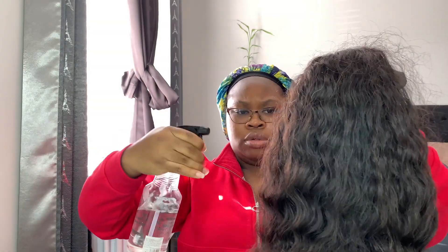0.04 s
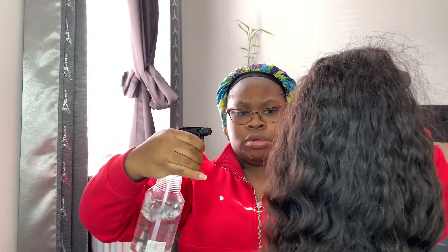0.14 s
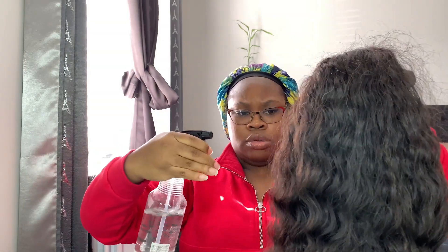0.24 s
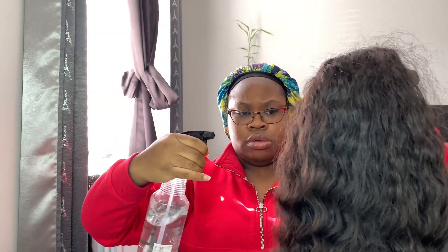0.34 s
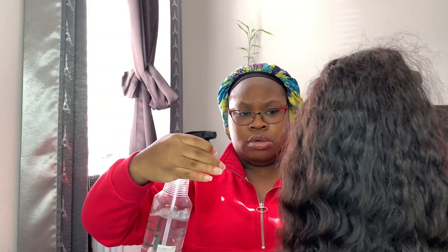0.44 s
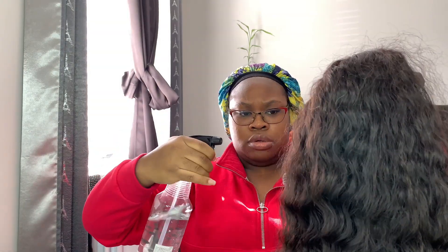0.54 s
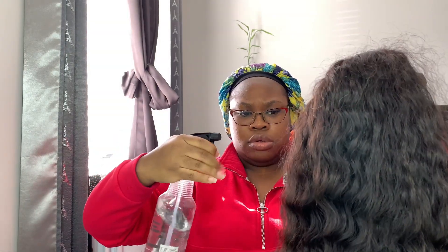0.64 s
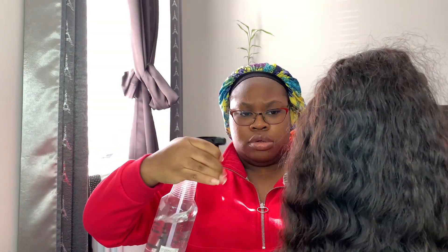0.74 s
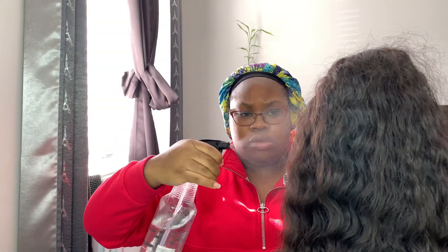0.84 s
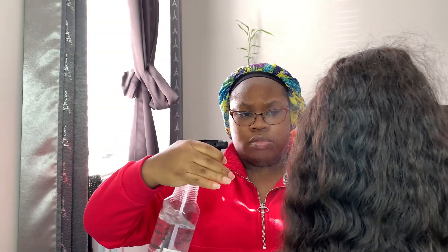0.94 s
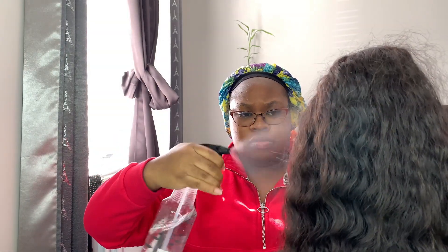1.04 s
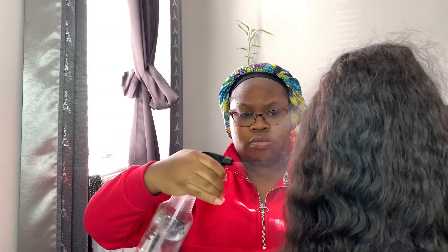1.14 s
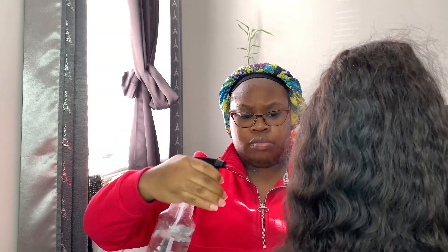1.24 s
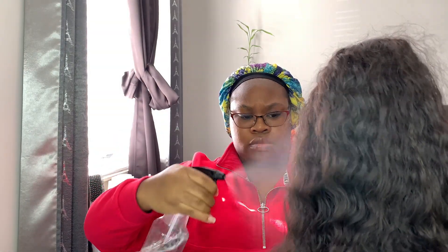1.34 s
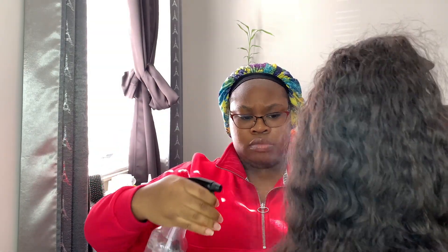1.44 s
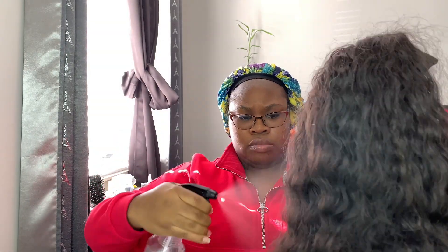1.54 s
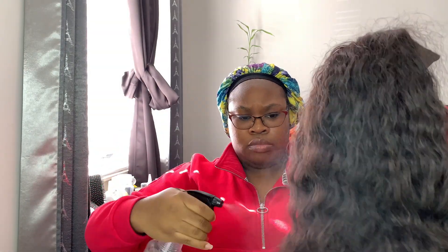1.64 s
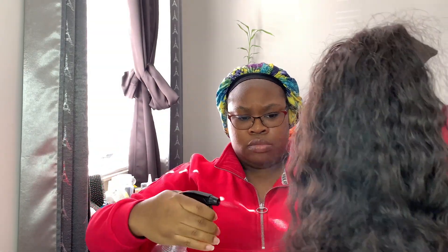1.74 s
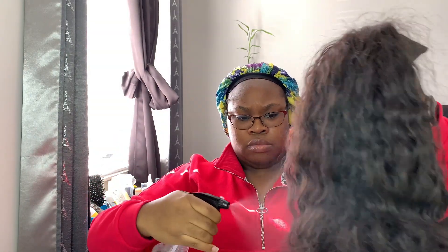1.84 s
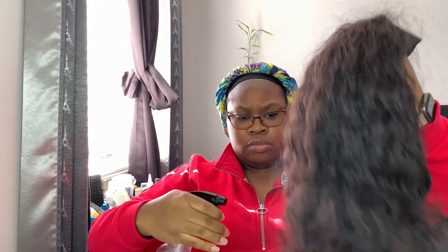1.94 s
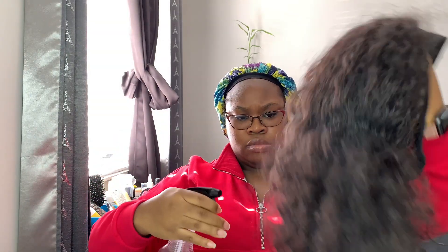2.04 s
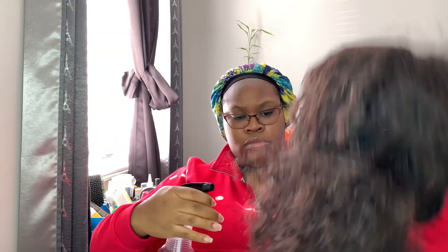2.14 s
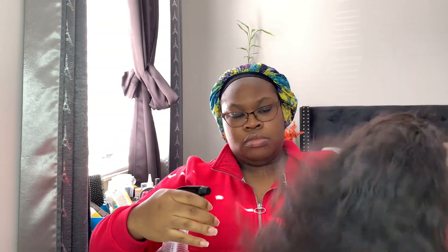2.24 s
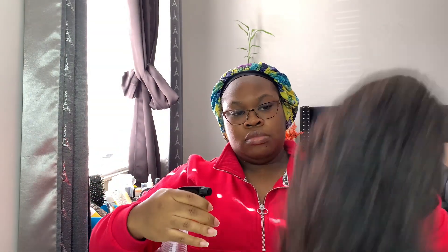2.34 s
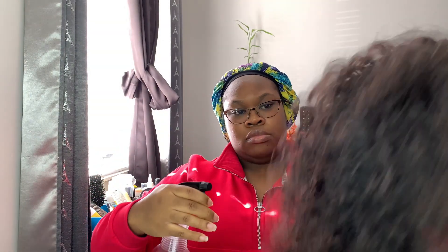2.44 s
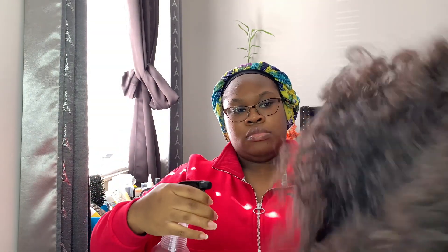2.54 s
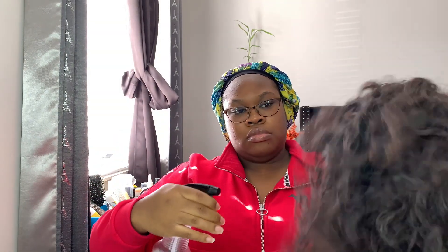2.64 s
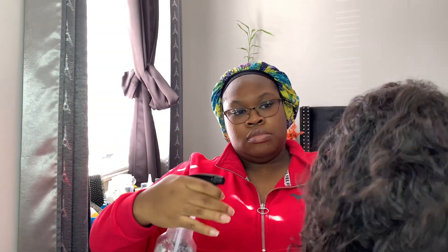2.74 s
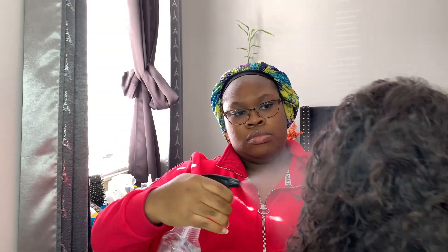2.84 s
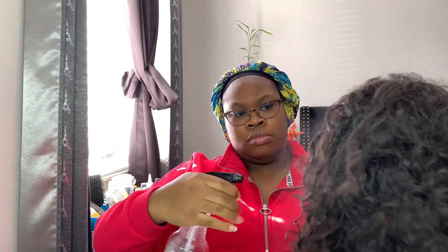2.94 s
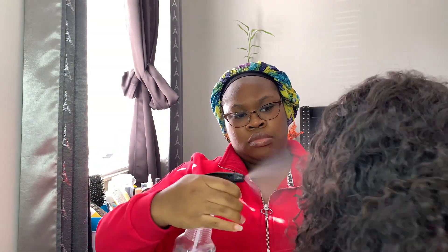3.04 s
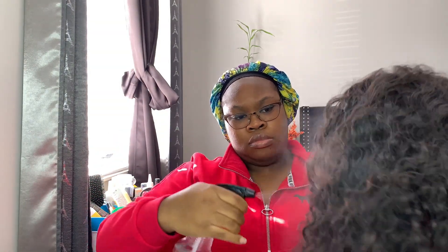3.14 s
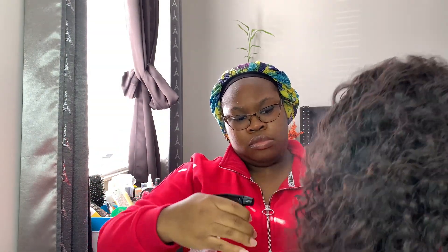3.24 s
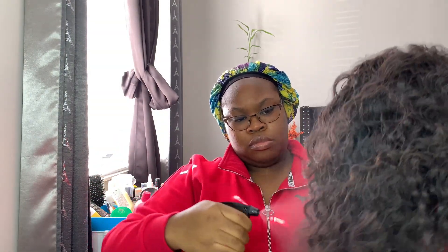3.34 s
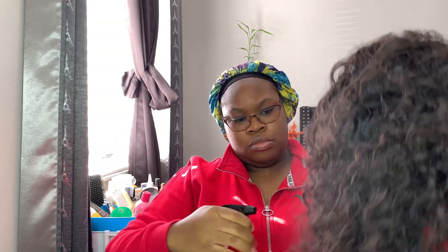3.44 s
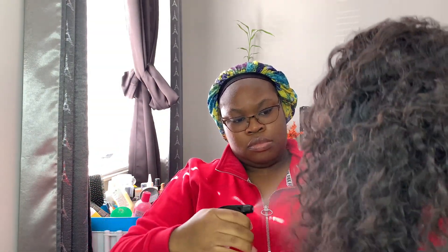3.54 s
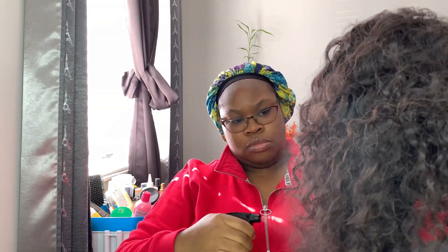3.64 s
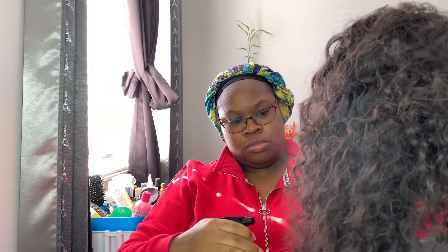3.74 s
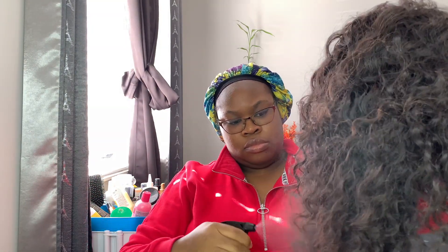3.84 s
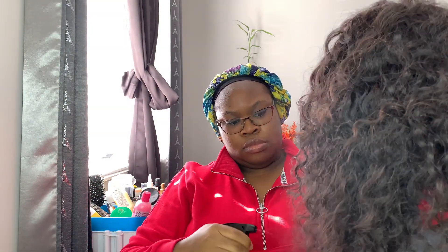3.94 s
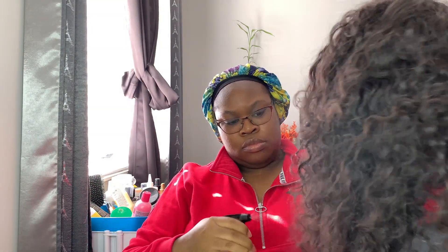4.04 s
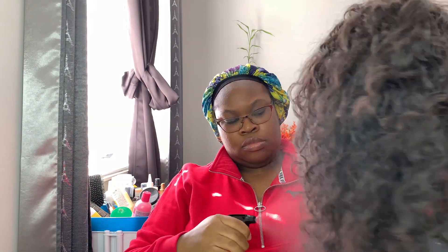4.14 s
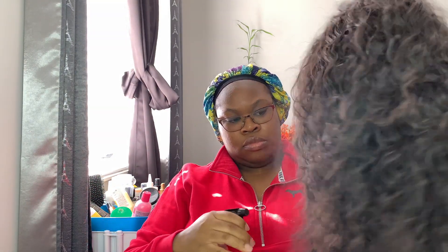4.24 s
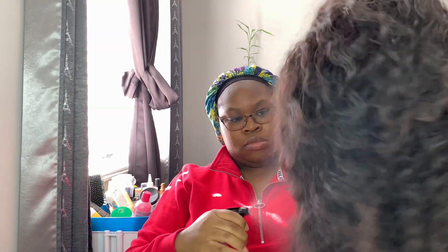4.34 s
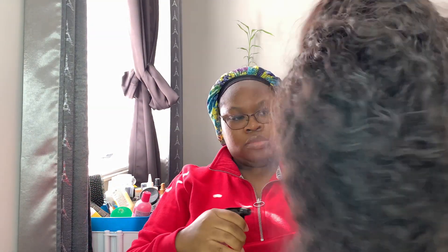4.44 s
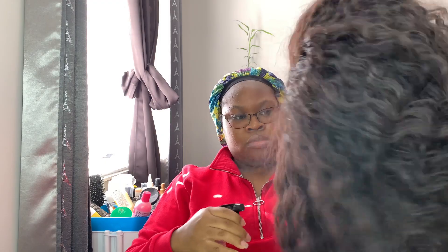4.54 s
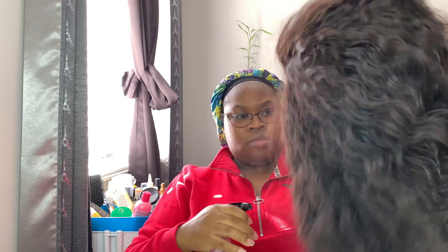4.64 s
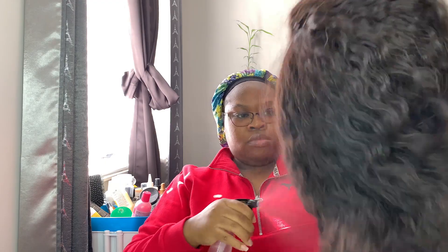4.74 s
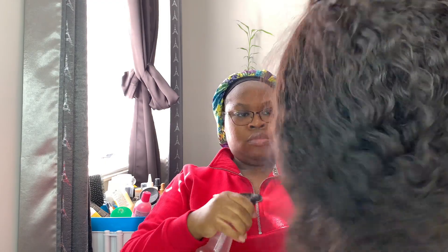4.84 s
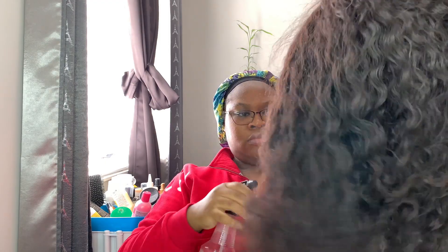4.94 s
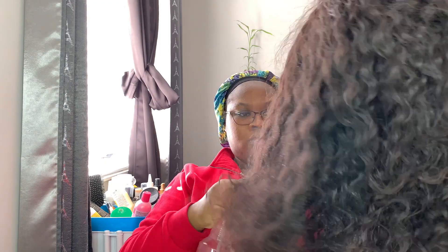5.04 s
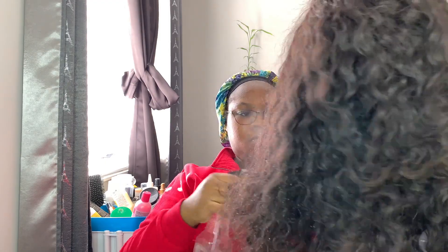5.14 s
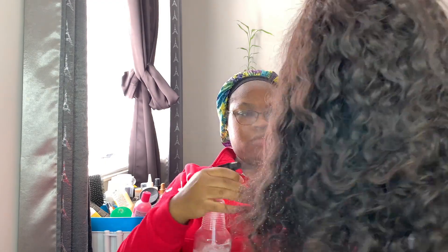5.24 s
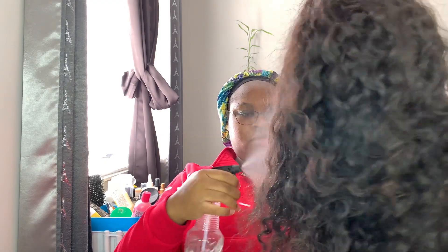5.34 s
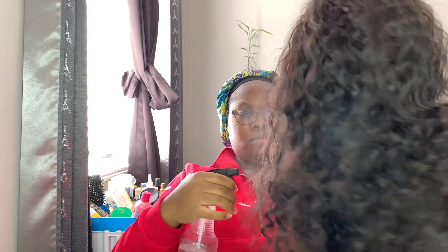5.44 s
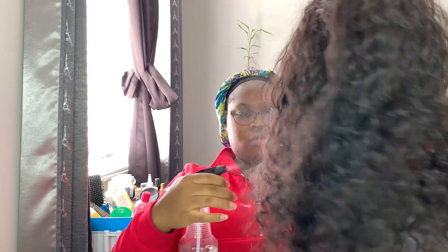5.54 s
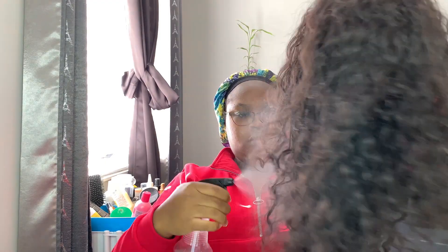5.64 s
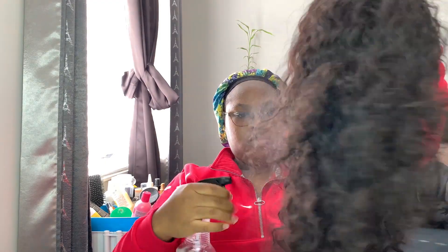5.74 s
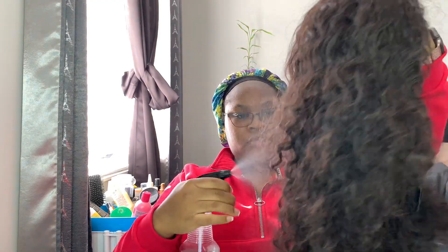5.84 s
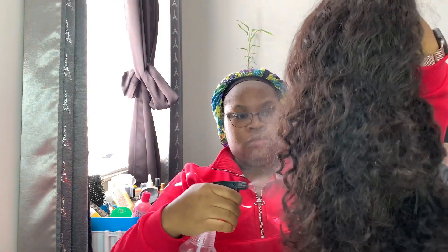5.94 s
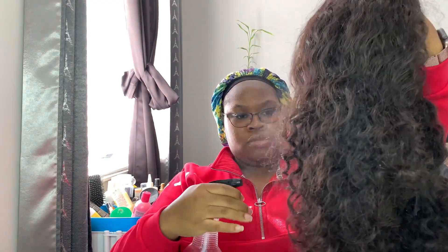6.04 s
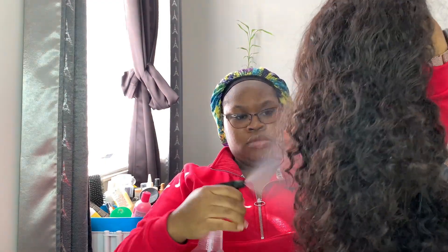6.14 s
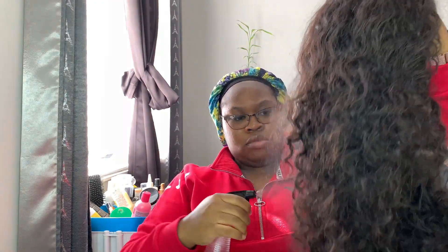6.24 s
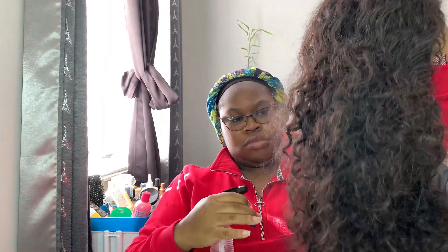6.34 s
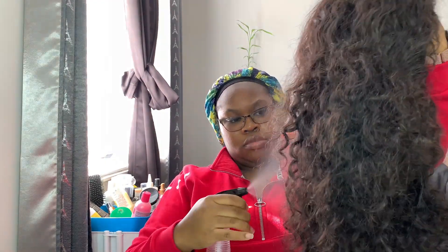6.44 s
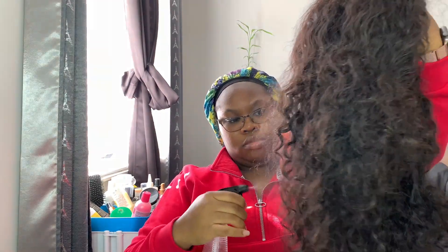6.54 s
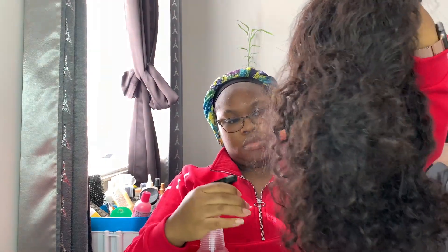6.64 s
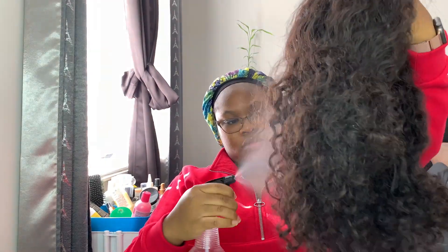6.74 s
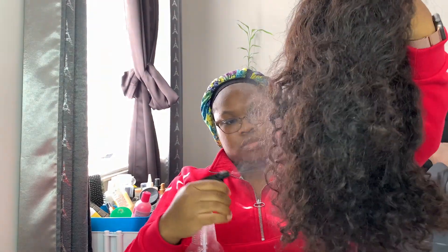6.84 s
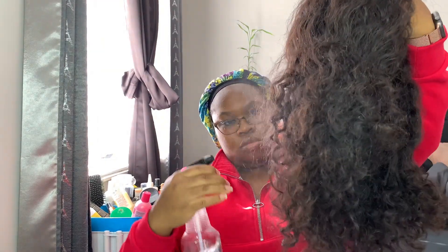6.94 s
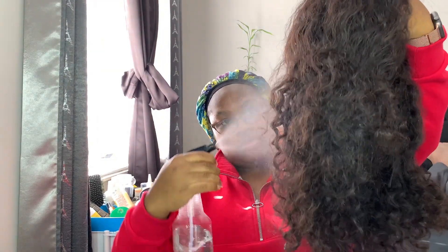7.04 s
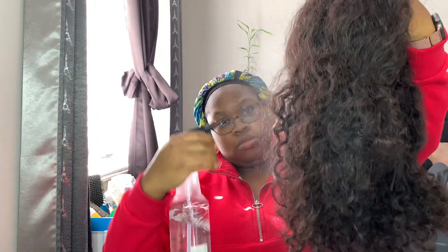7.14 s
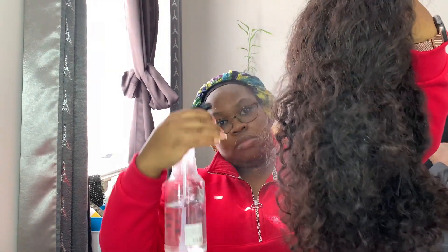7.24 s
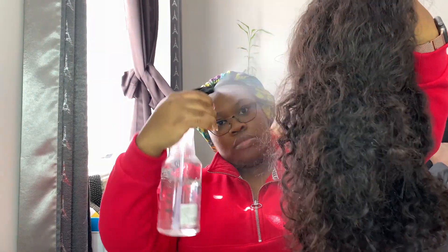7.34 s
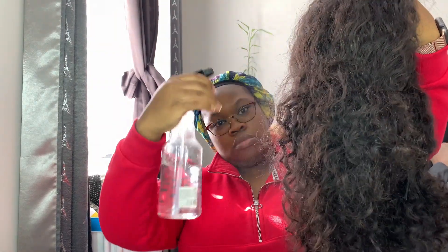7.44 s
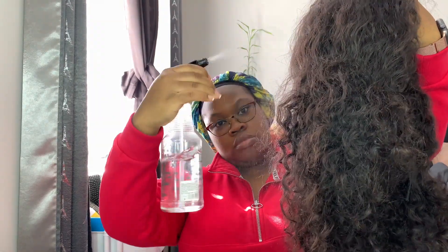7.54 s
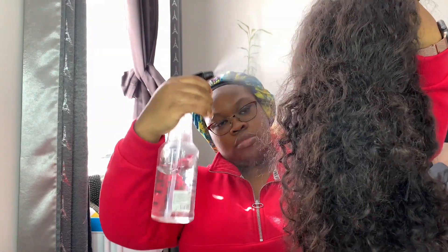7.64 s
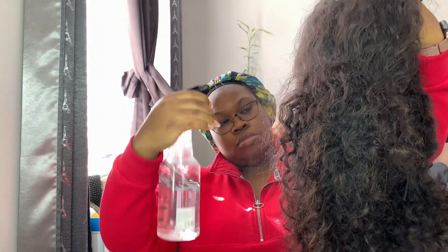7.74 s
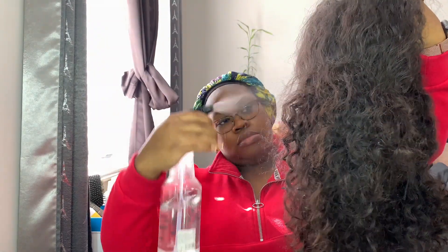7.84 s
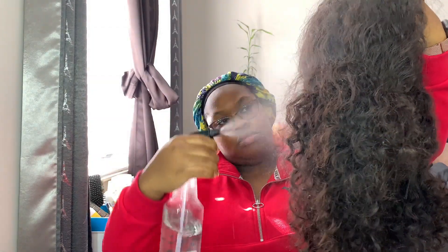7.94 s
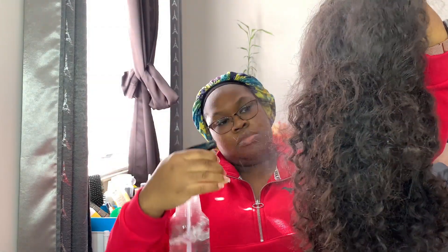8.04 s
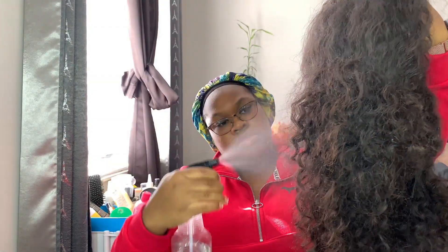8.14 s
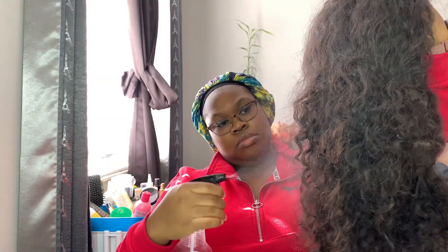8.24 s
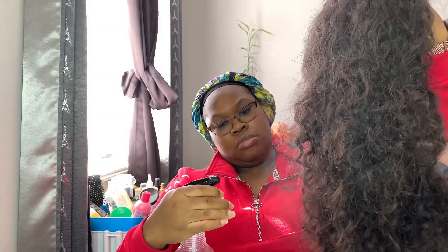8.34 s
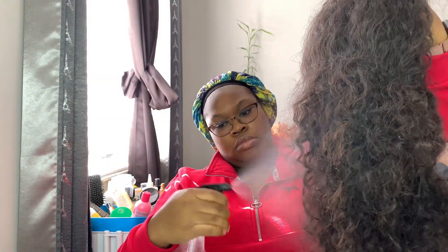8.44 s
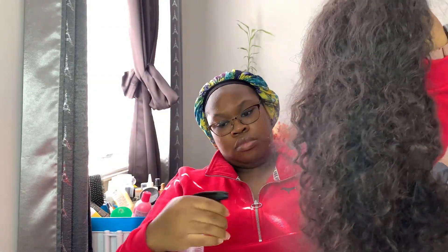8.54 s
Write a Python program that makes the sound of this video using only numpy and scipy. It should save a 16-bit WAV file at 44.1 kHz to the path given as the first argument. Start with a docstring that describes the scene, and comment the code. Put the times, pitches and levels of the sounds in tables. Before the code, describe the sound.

In a small furnished bedroom, a plastic spray bottle is pumped nearly four times a second. Each squeeze snaps, thumps the bottle dully and releases a short swell of hiss, followed by a creaky trigger return. Early strokes are weak and spit air; a pause of about one second brings faint hair rustle, then fuller sprays continue to the end. Close stereo microphone, soft short reflections, low room rumble.

```python
"""Trigger sprayer misting a wig

A plastic trigger sprayer mists a wig in a furnished bedroom, nearly four squeezes a second between pauses.
Each squeeze snaps the valve (ringing noise cracks), thumps the bottle (a sagging tone) and drives a swell
of hiss (shaped noise and clicks); the trigger creaks as it springs back (stick-slip clicks).
The first strokes spit air until the pump is primed. Now and then air gurgles into the bottle (short tones),
and the hair rustles (crackling noise) while the wig is turned."""
import sys
import numpy as np
from scipy import signal
from scipy.fft import rfft, irfft
from scipy.io import wavfile

SR = 44100
rng = np.random.default_rng(int(sys.argv[2]) if len(sys.argv) > 2 else 0)


def master(y):
    """Save y as 16-bit WAV."""
    cut = np.clip(np.atleast_2d(y).T, -1, 1)
    pcm = np.round(cut * 32767)  # scale
    wavfile.write(sys.argv[1], SR, pcm.astype(np.int16))


N = 379260
TIME = np.arange(N) / SR   # s
FREQS = np.maximum(np.arange(N // 2 + 1) * SR / N, 1)   # Hz
HALF_EACH_SIDE = np.array([[.5], [-.5]])   # splits a left-minus-right difference evenly

# each cycle of the trigger; levels are relative to the other squeezes:
# [t/s, squirt length/s, hiss level/dB, valve snap level/dB, bottle thump level/dB,
#  time the trigger is held/s, return creak level/dB]
SQUEEZES = [(.041, .042, -42, -63, -69, 0.14, -51), (0.2604, .07, -51.5, -34.5, -53, .131, -53.5),
            (0.5094, .046, -40, -36, -53, 0.14, -50), (.7173, 0.13, -43, -36, -42.5, 0.16, -48.5),
            (0.9755, 0.14, -44, -33, -37.5, 0.18, -53), (1.2305, 0.17, -40.5, -37, -40.5, .202, -51.5),
            (1.492, .14, -37.5, -28, -37, .181, -59.5), (1.7328, .13, -36.5, -34, -33.5, 0.2, -53.5),
            (2.781, .14, -38.5, -55, -71, 0.19, -53.5), (3.023, .14, -36.5, -33, -34, 0.18, -48),
            (3.262, .15, -34, -30.5, -33.5, .19, -46), (3.5225, .14, -34, -32, -31.5, 0.18, -45),
            (3.7854, .14, -35.5, -39, -37.5, 0.18, -49), (4.0448, 0.15, -36.5, -35, -35, 0.2, -51),
            (4.3061, .13, -38.5, -38, -36, .21, -88), (4.707, 0.15, -37, -54, -67, .212, -59),
            (4.9899, .16, -34, -45, -43, .21, -49.5), (5.271, 0.16, -35, -45, -42, 0.2, -49.5),
            (5.5429, 0.16, -35, -44, -45, 0.21, -48.5), (5.8252, .15, -36, -39.5, -35, .2, -47),
            (6.1027, .16, -34, -40, -36.5, 0.21, -51), (6.3859, .16, -36, -47, -40.5, 0.22, -54),
            (6.677, 0.17, -35, -52, -42, .216, -58.5), (6.9687, .16, -36.5, -37.5, -34.5, 0.21, -59.5),
            (7.2633, 0.15, -36.5, -48.5, -44.5, 0.24, -85), (7.5392, .17, -39, -33.5, -37, 0.21, -60.5),
            (7.8306, 0.15, -38.5, -32, -34.5, 0.24, -70), (8.1058, .14, -37, -29.5, -34.5, 0.21, -55.5),
            (8.377, 0.13, -34, -38, -37, 0.22, -60)]
# air drawn in with the water until the pump is primed: [t/s, share of air 0-1]
AIR_SHARE = [(0, 0.43), (.5, 0.12), (.74, 1), (1.0, 0.9), (1.3, 0.2), (1.7, 0.13), (8.6, 0.03)]
# bright ringing of the valve's plastic: [f/Hz, width/Hz, level/dB]
VALVE_MODES = [(8360, 760, 3.5), (11150, 2800, 0), (13000, 3400, -5.5), (6150, 2800, -7.5)]


def from_db(db):
    """Turn decibels into a plain gain."""
    return 10 ** (np.asarray(db) / 20)


def rms_one(x):
    """Scale to an average (rms) strength of 1."""
    return x / np.sqrt(np.mean(x ** 2) + 1e-20)


def at_hz(points):
    """Read a table of (Hz, value) at every frequency, on a logarithmic scale."""
    hz, value = np.transpose(points)
    return np.interp(np.log(FREQS), np.log(hz), value)


def at_time(points, s=TIME):
    """Read a table of (s, value) at the given times."""
    return np.interp(s, *np.transpose(points))


def colour(x, db):
    """Filter by a gain in dB at every frequency."""
    return irfft(rfft(x) * from_db(db), N)


def add(track, s, sound):
    """Mix a sound into the track at time s."""
    i = max(round(s * SR), 0)
    track[i:i + len(sound)] += sound[:max(N - i, 0)]


def resonate(x, modes):
    """Parallel resonances of (Hz, width in Hz, dB), signs alternating; white noise keeps its power."""
    out, power = 0, 0
    for k, (hz, width, db) in enumerate(modes):
        r = np.exp(-np.pi * width / SR)   # a wide mode loses its energy fast
        gain = from_db(db)
        zeros = np.array([1, 0, -1]) * (1 - r * r) / 2
        poles = [1, -2 * r * np.cos(2 * np.pi * hz / SR), r * r]
        out = out + (-1) ** k * gain * signal.lfilter(zeros, poles, x + 1e-18)
        power += gain ** 2 * (1 - r * r) / 2
    return out / np.sqrt(power)


def grains(n, per_s, spread_db):
    """Clicks at random moments, of uneven size and sign; rms 1."""
    clicks = np.zeros(n)
    count = max(round(per_s * n / SR), 2)
    place, size, sign = rng.random((count, 3)).T
    clicks[(place * n).astype(int)] = from_db(spread_db * size) * np.sign(sign - .5)
    return rms_one(clicks)


def burst(decay_s, rise_s=0.00024, size=1500):
    """A crack: noise that builds and dies within milliseconds."""
    t = np.arange(size) / SR
    return rng.standard_normal(size) * (1 - np.exp(-t / rise_s)) * np.exp(-t / decay_s)


def stroke_flow(n):
    """Flow during one squeeze: half a sine wave, from nothing to full and back."""
    return np.sin(np.pi * (np.arange(n) + .5) / n)


def mist(arch=1.356, treble_arch=1.0, flutter_db=1.0):
    """Flow swells and ebbs; the jet hisses and coarse droplets patter on the hair, more so with air."""
    # hiss of the jet: [f/Hz, level per Hz/dB]
    jet_hiss = [(120, -23), (300, -19), (460, -14), (590, -23), (800, -15.5), (1130, -11), (1580, 0),
                (2000, -4), (3000, -3.5), (5300, -6), (6600, -3.5), (7400, -1.5), (9000, -3.5),
                (11000, -5.5), (15400, -10)]
    # peaks and dips of the nozzle: [f/Hz, width/Hz, level/dB]
    nozzle_modes = [(1700, 450, 3), (2770, 690, 2.5), (5220, 280, 7), (6530, 2900, -5), (1970, 200, -3.5)]
    # width of the mist cloud: [f/Hz, side minus middle level/dB]
    cloud_width = [(300, -19), (600, -2), (1100, -29), (2000, -21), (4500, -3), (8000, -8.5), (15000, -26)]
    # the jet turning towards the listener: [t/s, level change around 5 kHz/dB]
    jet_aim = [(0, 0.5), (1.6, -2), (3, 0.5), (4.3, 0.5), (5.2, 0), (6.7, 0), (7.2, -3), (7.9, -2),
               (8.4, -0.5)]
    # pure air: share of coarse droplets, extra sizzle in dB
    air_coarse, air_treble_db = 0.4, 9.5
    # the sizzle falls off less than the hiss in a weaker squirt
    full_squirt_db, treble_follows = -37, 0.75

    jet, fine = np.zeros((2, 2, N))
    cloud = np.zeros(N)
    for s, length, db, *_ in SQUEEZES:
        air = at_time(AIR_SHARE, s)
        coarse = air_coarse * air
        sizzle_db = full_squirt_db + treble_follows * (db - full_squirt_db) + air_treble_db * air
        n = int(length * SR)
        flow = stroke_flow(n)
        wobble = np.interp(np.arange(n), np.linspace(0, n, num=24), rng.standard_normal(24))
        flutter = from_db(flutter_db * wobble)
        smooth, wide = rng.standard_normal((2, n))
        patter = grains(n, per_s=900, spread_db=22)
        noise = flutter * (np.sqrt(1 - coarse) * smooth + np.sqrt(coarse) * patter)
        hiss = scatter(from_db(db) * flow ** arch * noise, share=0.55, spread_s=.005)
        sizzle = scatter(from_db(sizzle_db) * flow ** treble_arch * noise, share=0.38, spread_s=.003)
        add(cloud, s, from_db(db) * flow ** arch * flutter * wide)
        for side in range(2):
            add(jet[side], s, hiss[side])
            add(fine[side], s, sizzle[side])

    shape_db = at_hz(jet_hiss)
    for hz, width, db in nozzle_modes:
        shape_db = shape_db + db / (1 + (2 * (FREQS - hz) / width) ** 2)
    high = at_hz([(3500, 0.097), (8000, 0.62), (14000, 1)])   # share of sizzle at each frequency
    # the cloud is wide, so each side hears partly its own hiss
    apart = rfft(cloud) * from_db(at_hz(cloud_width)) * [[1], [-1]]
    spectrum = rfft(jet) * (1 - high) + rfft(fine) * high + apart
    spray = irfft(spectrum * rms_one(from_db(shape_db)), N)
    beam = colour(spray, at_hz([(1800, -4.5), (3200, 2.5), (5000, 4.5), (6500, 4), (9000, -4.5)]))
    return spray + beam * (from_db(at_time(jet_aim)) - 1)


def scatter(x, share, spread_s, count=14):
    """Early reflections off hair, hand and face: new ones at each side for every squeeze."""
    paths = np.zeros((2, round(spread_s * SR)))
    for path in paths:
        when, size = rng.random(count), rng.standard_normal(count)
        place = (when * (len(path) - 8)).astype(int) + 8
        path[place] = share * size / np.linalg.norm(size)
    paths[:, 0] = 1   # the direct sound
    return signal.fftconvolve(x[None], paths, axes=1) / np.sqrt(1 + share ** 2)


def sputter(level_db=-43, arch=1.8):
    """Until the pump is primed, air bursts through the nozzle in a bright spatter around mid-stroke."""
    # air spat through the nozzle: [f/Hz, level per Hz/dB]
    spat_air = [(3000, -40), (7000, -18), (9500, -9), (13800, 7), (16000, -13)]
    out = np.zeros(N)
    for s, length, *_ in SQUEEZES:
        n = int(length * SR)
        spatter = grains(n, per_s=1900, spread_db=34)
        add(out, s, at_time(AIR_SHARE, s) ** 2 * stroke_flow(n) ** arch * spatter)
    return from_db(level_db) * irfft(rfft(out) * rms_one(from_db(at_hz(spat_air))), N)


def pump_rush(fade=0.85):
    """Water forced through the pump churns dully during each stroke."""
    # water in the pump: [t/s, level/dB]
    churn_level = [(0, -56), (3, -61), (4.5, -54), (6.5, -63.5), (8.15, -52)]
    # dull colour of the churning: [f/Hz, level per Hz/dB]
    churn_colour = [(100, 1), (200, 2.5), (420, -3), (580, -9), (780, 2), (1100, -1), (1800, -1.5),
                    (4000, -34)]
    out = np.zeros(N)
    for s, length, *_ in SQUEEZES:
        n = int(length * SR)
        travel = (np.arange(n) + .5) / n
        churn = grains(n, per_s=300, spread_db=17.5)
        add(out, s, churn * np.sqrt(stroke_flow(n)) * np.exp(-fade * travel))
    out *= from_db(at_time(churn_level))
    return irfft(rfft(out) * rms_one(from_db(at_hz(churn_colour))), N)


def clicks_of_trigger():
    """Every squeeze and every catch jolts the sprayer: rows of (s, snap dB, thump dB)."""
    # the trigger catches between squirts or in mid-stroke: [t/s, snap level/dB, bottle thump level/dB]
    catches = [(0.1963, -38, -58.5), (.237, -38.5, -54), (0.2698, -39, -56), (0.4816, -43, -42),
               (0.6961, -36.5, -40), (0.7818, -35, -59), (.9245, -32, -39), (0.9467, -37, -49),
               (1.198, -38, -42), (1.589, -33, -60), (1.9645, -42, -47), (2.1751, -43.5, -67),
               (2.9972, -38, -45), (3.236, -39, -49)]
    squeezes = [(s, snap_db, thump_db) for s, _, _, snap_db, thump_db, _, _ in SQUEEZES]
    return squeezes + list(catches)


def snaps(high_db=4.0, low_db=-13, thump_share=0.57):
    """Short cracks ring in the plastic; the harder the bottle is jolted, the more the low modes ring."""
    # low ringing of valve and trigger: [f/Hz, width/Hz, level/dB]
    low_modes = [(1320, 550, 8), (1760, 880, -4.5), (2530, 270, 2.5), (4040, 300, -2)]
    high, low = np.zeros((2, N))
    for s, db, thump_db in clicks_of_trigger():
        add(high, s, from_db(db + high_db) * burst(decay_s=0.0031))
        add(low, s, from_db(db + thump_share * (thump_db - db) + low_db) * burst(decay_s=0.014))
    return resonate(high, VALVE_MODES) + resonate(low, low_modes)


def thumps(swell_s=0.0072, ring_s=0.024, ring_share=0.33, bend=0.096, bend_s=.006, slack=5, level_db=-3):
    """The bottle wall swings up over about two cycles, sags in pitch and dies; a low pitch swings longer."""
    # pitch at the height of the usual thump; it drops while the bottle hangs free in the raised hand:
    # [t/s, f/Hz]
    bottle_pitch = [(0, 257), (1, 267), (7.26, 269), (7.54, 261), (8.11, 257), (8.38, 272)]
    usual_hz, lag_s = 266.7, 0.0023   # the wall answers just after each snap
    out, t = np.zeros(N), np.arange(SR // 8) / SR
    jolts = clicks_of_trigger()
    for (s, _, db), grip in zip(jolts, rng.standard_normal(len(jolts))):
        hz = at_time(bottle_pitch, s)
        swell = swell_s * np.exp(0.13 * grip) * (usual_hz / hz) ** slack
        swing = (t / swell * np.exp(1 - t / swell)) ** 2.3
        ring = ring_share * (1 - np.exp(-t / swell)) * np.exp(-t / ring_s)
        sag = bend * (np.exp(-t / bend_s) - np.exp(-swell / bend_s))   # zero at the swing's peak
        cycles = np.cumsum(hz * (1 + sag)) / SR
        add(out, s + lag_s, from_db(db + level_db) * (swing + ring) * np.sin(2 * np.pi * cycles))
    return out


def trigger_returns(fade=1.0, spring_db=0.5, body_db=-57.5, body_follows=0.63, tick_db=5):
    """Let go, the piston sticks and slips back, rasping spring and pump body; the valve ticks once."""
    # ringing of the return spring: [f/Hz, width/Hz, level/dB]
    spring_modes = [(7800, 540, -8.5), (9120, 3000, -14), (5560, 5700, -13.5)]
    # ringing of the pump body: [f/Hz, width/Hz, level/dB]
    body_modes = [(1326, 160, 0.5), (1614, 104, 3.5), (2860, 610, 2)]
    return_s, usual_db = .037, -51   # length and usual level of the way back
    n = int(return_s * SR)
    spring, body, valve = np.zeros((3, N))
    for (s, *_, held, db), seat in zip(SQUEEZES, rng.random(len(SQUEEZES))):
        rasp = grains(n, per_s=380, spread_db=15) + 0.5 * rng.standard_normal(n)
        slips = rasp * np.exp(-fade * np.arange(n) / n)
        add(spring, s + held, from_db(db + spring_db) * slips)
        add(body, s + held, from_db(body_db + body_follows * (db - usual_db)) * slips)
        add(valve, s + held + seat ** 2 * return_s, from_db(db + tick_db) * burst(decay_s=0.002))
    return resonate(spring, spring_modes) + resonate(body, body_modes) + resonate(valve, VALVE_MODES)


def knocks(ring_db=-3, width_hz=90, lower_mode=0.77, lower_db=-2):
    """Each hollow knock rings a pair of close modes of the spray head, under a bright crack."""
    # knocks of the spray head: [t/s, blow level/dB, ringing f/Hz, bright crack level/dB]
    head_knocks = [(0.222, -39, 1740, 4), (0.409, -48, 2580, -3), (1.14, -45.5, 1780, 2),
                   (1.196, -30, 1843, -14), (2.6338, -61, 1370, -10), (4.519, -50, 1280, -29),
                   (4.549, -62, 2500, -17), (7.5426, -39.5, 1490, -7), (7.832, -41.5, 1440, -16),
                   (8.105, -41, 1290, -15), (8.588, -51.5, 2680, -8)]
    # bright crack of the head: [f/Hz, width/Hz, level/dB]
    head_modes = [(2640, 1800, 6), (4200, 1800, 4.5)]
    out = np.zeros(N)
    for s, db, hz, bright_db in head_knocks:
        blow = from_db(db) * burst(decay_s=0.0057)
        ring = resonate(blow, [(hz, width_hz, 0), (hz * lower_mode, width_hz, lower_db)])
        crack = resonate(blow, head_modes)
        add(out, s, from_db(ring_db) * ring + from_db(bright_db) * crack)
    return out


def gurgles(low_hz=600, high_hz=1450, cycles=0.97, count=18):
    """Air enters the bottle as a cluster of bubbles, each a tone that dies within a few cycles."""
    # air bubbling into the bottle: [t/s, length/s, level/dB]
    bubblings = [(0.051, 0.028, -58), (0.276, 0.038, -59), (0.522, 0.03, -55), (1.68, 0.039, -52),
                 (3.493, 0.022, -45.5), (3.758, 0.027, -57), (7.548, 0.025, -52.5), (7.844, 0.037, -54),
                 (8.107, 0.02, -51)]
    out, t = np.zeros(N), np.arange(SR // 20) / SR
    for s, length, db in bubblings:
        for when, size in rng.random((count, 2)):
            hz = low_hz * (high_hz / low_hz) ** size
            bubble = np.sin(2 * np.pi * hz * t) * np.exp(-hz * t / cycles)
            add(out, s + when * length, from_db(db) * bubble)
    return out


def hair(swell_s=0.032, sharpness=1.6, level_db=3.5):
    """Strands slide over each other in a fine crackle, which swells and dies with each sweep."""
    # the hair is swept round: [t/s, relative level/dB]
    sweeps = [(2.125, -61.5), (2.37, -65)]
    # crackle of the strands: [f/Hz, level per Hz/dB]
    strand_colour = [(470, -53), (800, -35), (1570, -12.5), (4130, -11.5), (4570, -15), (7730, -14),
                     (13900, -12), (16000, -8)]
    # faint rustle while the wig is being held up and turned; level relative, as for the sweeps
    handling_until_s, handling_db = 2.45, -71.5
    motion = from_db(handling_db) * np.clip((handling_until_s - TIME) / swell_s, 0, 1)
    for s, db in sweeps:
        age = np.maximum(TIME - s, 0) / swell_s
        motion = motion + from_db(db) * np.maximum(age * np.exp(1 - age), 1e-9) ** sharpness
    crackle = grains(N, per_s=1300, spread_db=38) + 0.49 * rng.standard_normal(N)
    return from_db(level_db) * motion * rms_one(colour(crackle, at_hz(strand_colour)))


def bedroom(x, t60=0.29, treble_t60=0.16, split_hz=6000, first_s=0.0011, wet_db=-6.5):
    """Diffuse reflections, different at each side; curtains and bedding swallow the treble first."""
    # colour of the reflections: [f/Hz, level/dB]
    echo_colour = [(100, -16), (260, 2), (600, 5), (1600, -5.5), (4000, -1.5), (9000, 1.5), (15000, 2.5)]
    t = np.arange(SR // 2) / SR
    noise = rng.standard_normal((2, len(t)))
    dull = signal.sosfiltfilt(signal.butter(2, split_hz, fs=SR, output="sos"), noise)
    bright = noise - dull
    echoes = dull * from_db(-60 * t / t60) + bright * from_db(-60 * t / treble_t60)
    echoes = echoes * (t > first_s)   # silent until the first reflection
    wet = signal.fftconvolve(x[None], rms_one(echoes) / np.sqrt(len(t)), axes=1)[:, :N]
    return colour(wet, at_hz(echo_colour) + wet_db)


def drift(per_s, size=400):
    """Slow chance: a new random value several times a second, joined by straight lines."""
    return np.interp(TIME * per_s, np.arange(size), rng.standard_normal(size))


def background(floor_db=-72.5, waver_db=2.5, wavers_per_s=7):
    """Faint hiss over a wavering rumble, alike at both sides in the bass."""
    # faint hiss: [f/Hz, level per Hz/dB]
    floor_colour = [(20, -33), (45, -23.5), (80, -10.5), (120, -45), (185, -17), (380, -29.5), (450, -28.5),
                    (600, -39.5), (1500, -40), (6000, -49.5), (8600, -42), (14000, -46), (16000, -60)]
    # low room rumble: [f/Hz, level per Hz/dB]
    rumble_colour = [(12, -50), (25, -23), (45, -3), (62, 1.5), (100, 0), (135, -5.5), (220, -23.5),
                     (500, -50)]
    # the rumble around which the level wavers: [t/s, level/dB]
    rumble_level = [(0, -66), (1, -67), (1.6, -65), (2.3, -63), (2.65, -71.5), (3.1, -63), (6.3, -67),
                    (8.6, -65)]
    mid, side, low = rng.standard_normal((3, N))
    side = colour(side, at_hz([(80, -19.5), (400, -1.5), (3000, -1.5)])) * [[1], [-1]]
    floor = from_db(floor_db) * rms_one(colour(mid + side, at_hz(floor_colour)))
    rumble = rms_one(colour(low + side, at_hz(rumble_colour)))
    return floor + rumble * from_db(at_time(rumble_level) + waver_db * drift(wavers_per_s))


def scene(thump_room_db=-8):
    """Sprayer and reflections reach the sides at slightly different levels, over the background."""
    # level difference between the sides: [f/Hz, left minus right level/dB]
    side_balance = [(60, 0), (110, 0), (220, -6), (350, -6), (650, 1.5), (1300, -.5), (2400, -1.5),
                    (4400, -2), (8100, 0), (15000, 0)]
    spray = mist() + sputter() + pump_rush() + snaps() + knocks() + trigger_returns() + gurgles() + hair()
    bottle = thumps()
    # the small bottle radiates little bass far into the room
    room = bedroom(spray.mean(axis=0) + from_db(thump_room_db) * bottle)
    return colour(spray + bottle + room, HALF_EACH_SIDE * at_hz(side_balance)) + background()


def record(dry):
    """The stereo microphone narrows the treble, shifts phase between its sides and thins deep bass."""
    # the stereo image closes up in the treble: [f/Hz, level of the difference between the sides/dB]
    image_width = [(300, 1), (1600, 0), (4000, 1.5), (6800, 3.5), (8200, -3.5), (9200, -7), (10300, -3),
                   (11300, -21), (12100, -22), (12800, -2), (14000, -20)]
    # microphone colour: [f/Hz, level/dB]
    bass_response = [(16, -14), (28, -8), (42, 0)]
    # phase difference between the sides: [f/Hz, angle by which left leads/rad]
    side_phase = [(60, 0), (340, -.3), (620, 2.3), (900, .9), (1200, .3), (1800, .7), (2200, -.2),
                  (3400, 2), (3800, .6), (4750, 2.3), (5100, .1), (5500, -.2), (6700, -2.2), (7200, -3.3),
                  (9000, -6.25), (9600, -6.3), (10400, -7.4), (11150, -9.35), (12200, -9.5),
                  (13200, -12.35), (14900, -12.8), (15400, -15.5)]
    mid = dry.mean(axis=0)
    narrowed = mid + colour(dry - mid, at_hz(image_width))
    response = from_db(at_hz(bass_response)) * np.exp(1j * HALF_EACH_SIDE * at_hz(side_phase))
    heard = irfft(rfft(narrowed) * response, N)
    top_cut = signal.ellip(10, .2, 80, 15700, fs=SR, output="sos")   # steep cut above 15.7 kHz
    return signal.sosfilt(top_cut, heard)


dry = scene()
out = record(dry)
master(out)
```